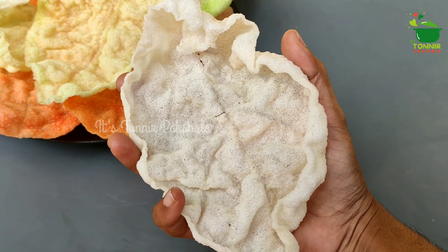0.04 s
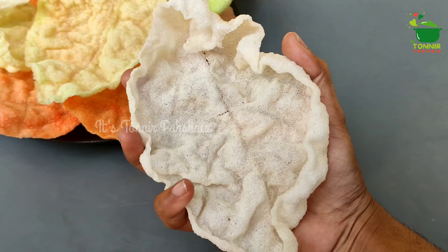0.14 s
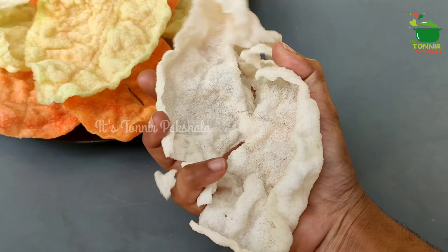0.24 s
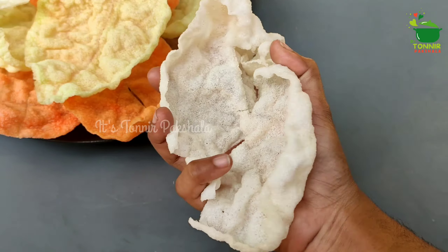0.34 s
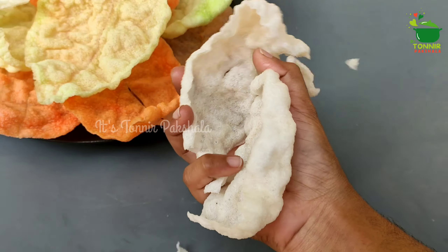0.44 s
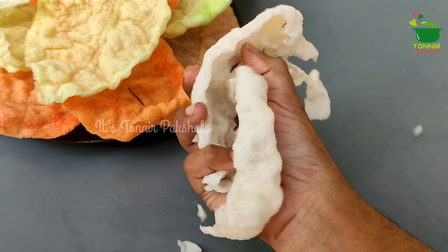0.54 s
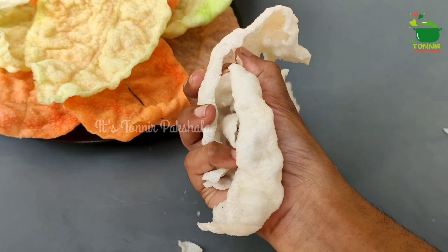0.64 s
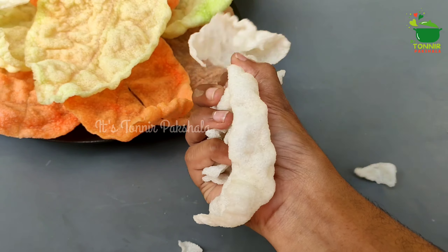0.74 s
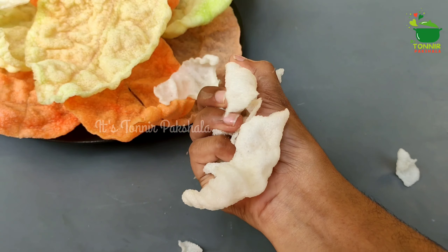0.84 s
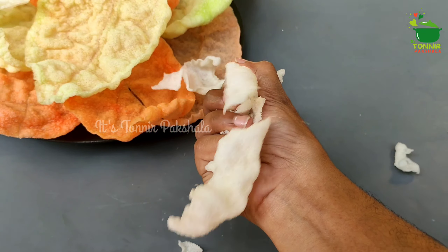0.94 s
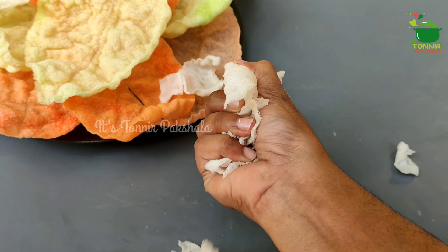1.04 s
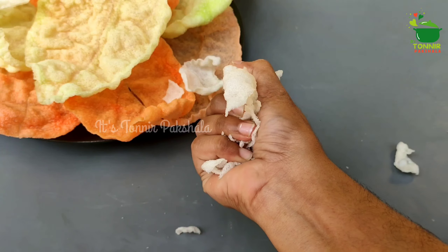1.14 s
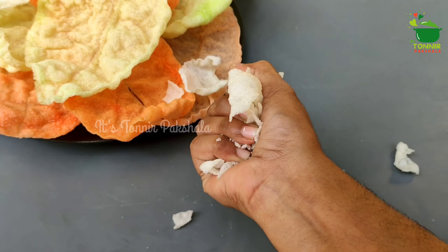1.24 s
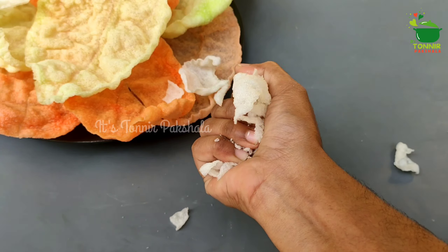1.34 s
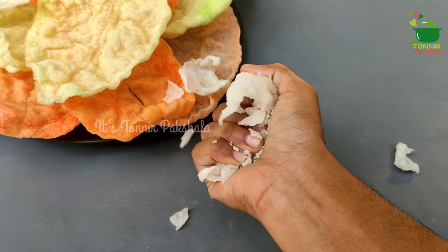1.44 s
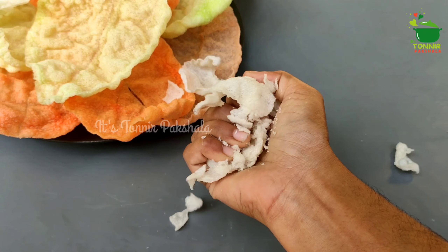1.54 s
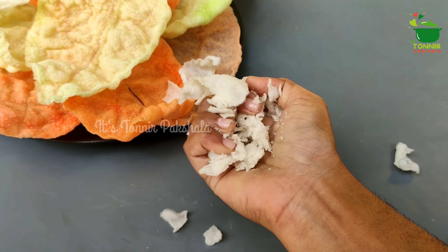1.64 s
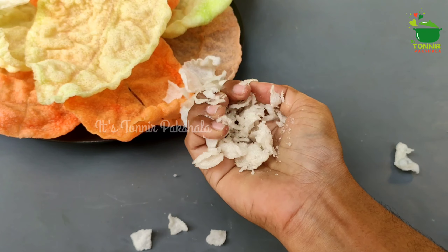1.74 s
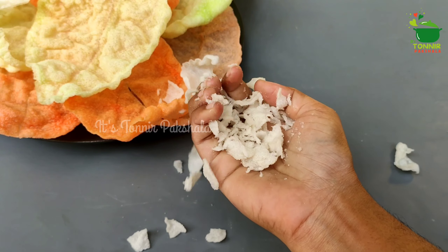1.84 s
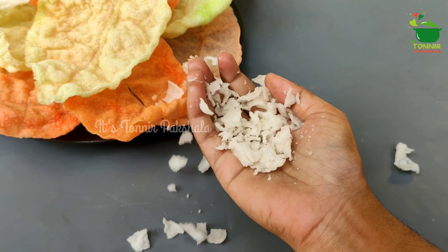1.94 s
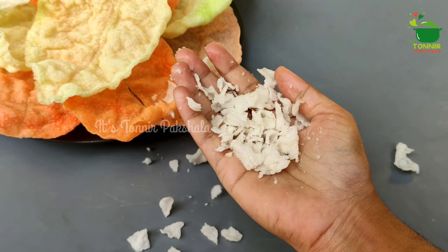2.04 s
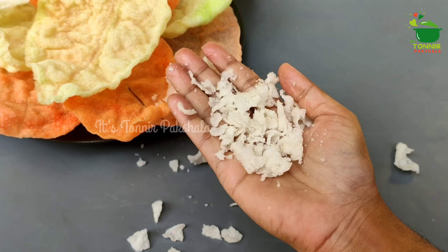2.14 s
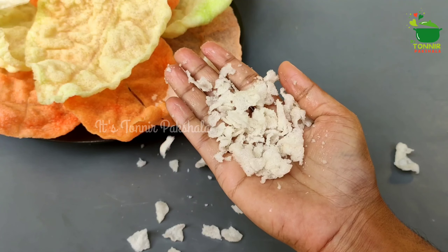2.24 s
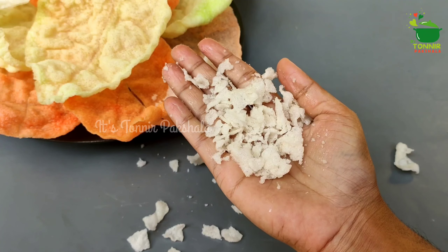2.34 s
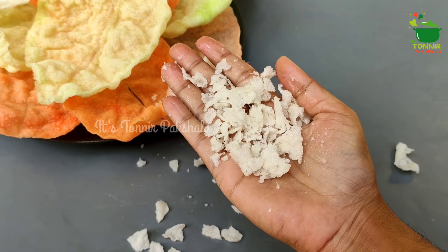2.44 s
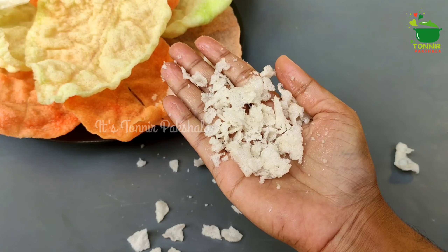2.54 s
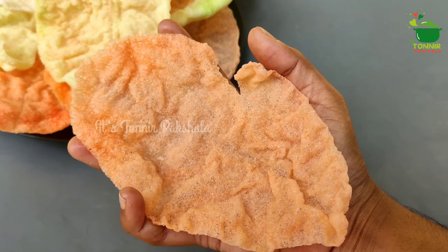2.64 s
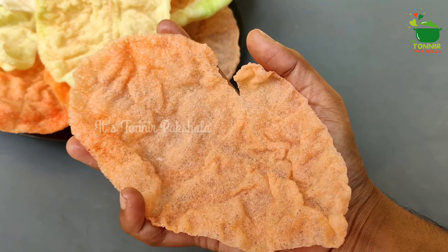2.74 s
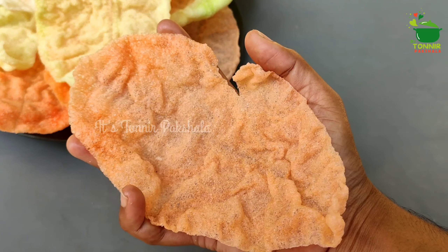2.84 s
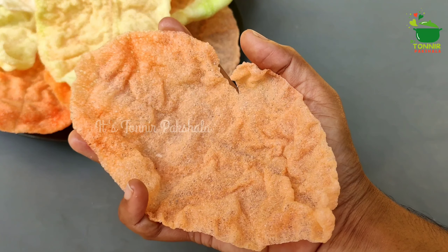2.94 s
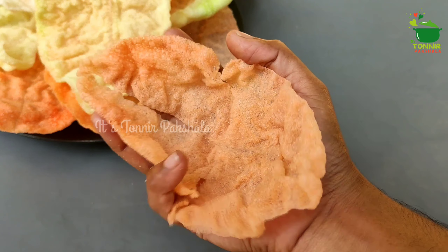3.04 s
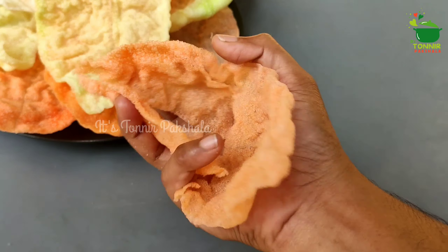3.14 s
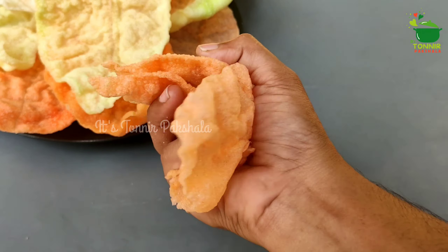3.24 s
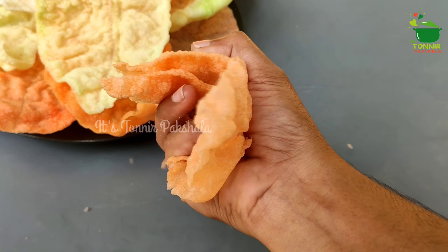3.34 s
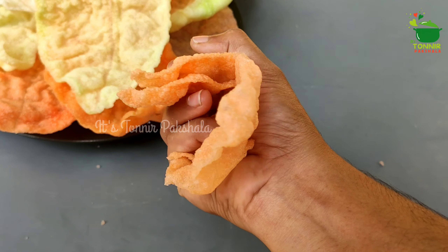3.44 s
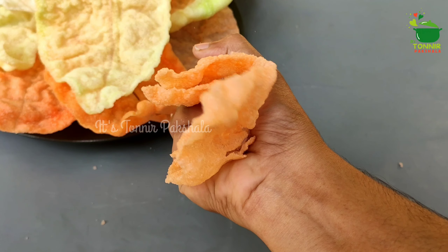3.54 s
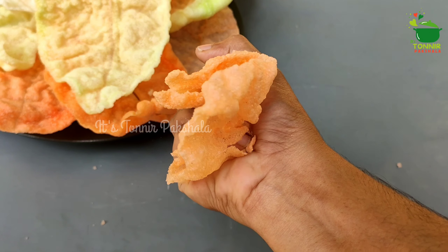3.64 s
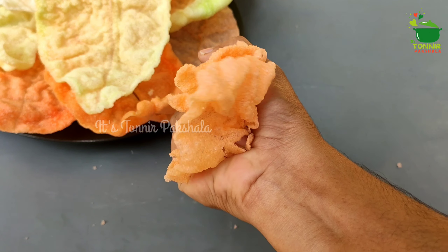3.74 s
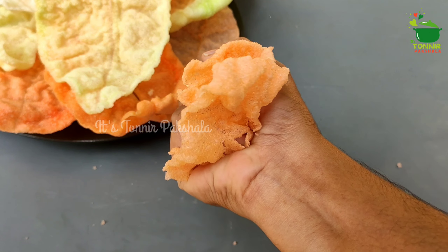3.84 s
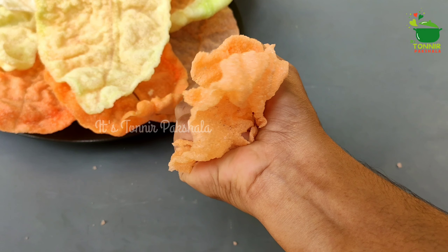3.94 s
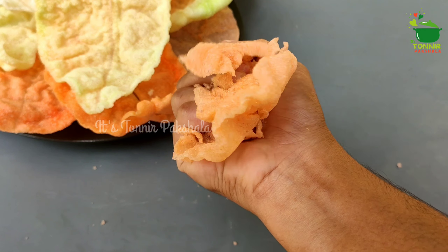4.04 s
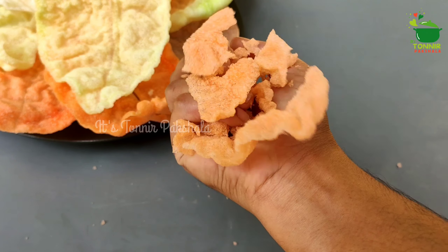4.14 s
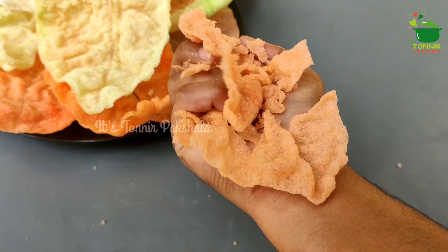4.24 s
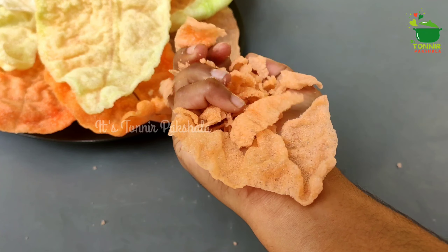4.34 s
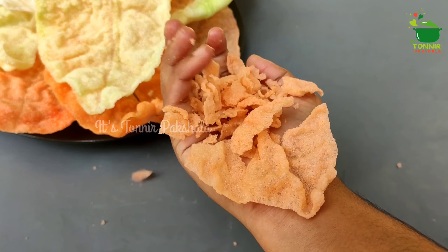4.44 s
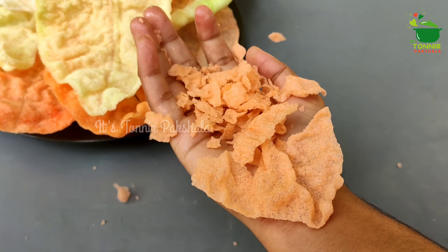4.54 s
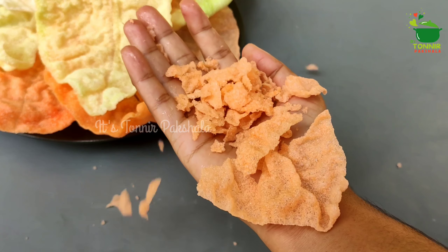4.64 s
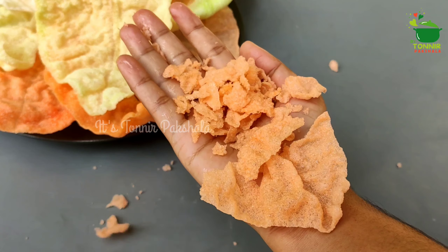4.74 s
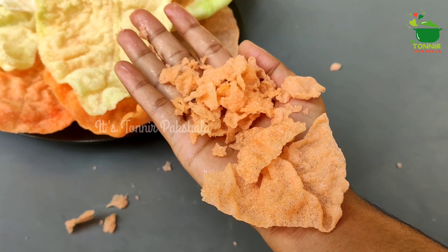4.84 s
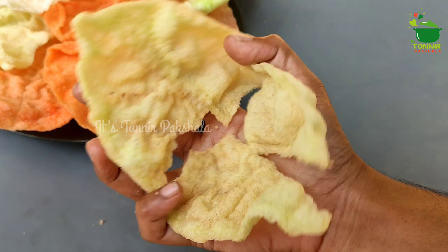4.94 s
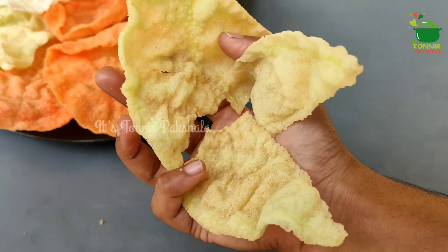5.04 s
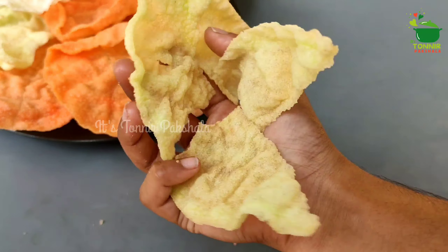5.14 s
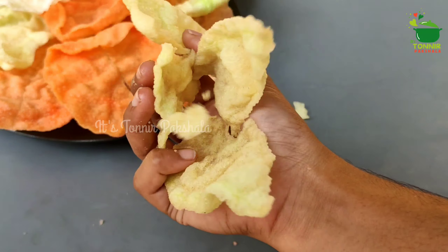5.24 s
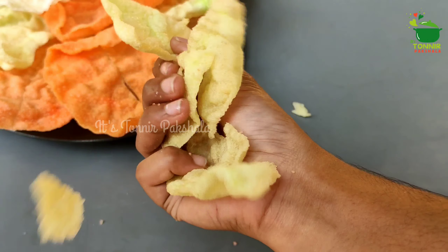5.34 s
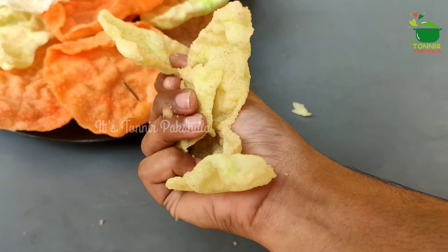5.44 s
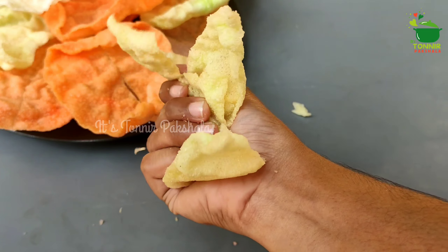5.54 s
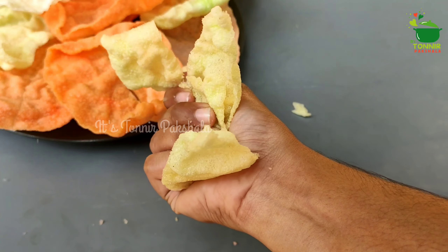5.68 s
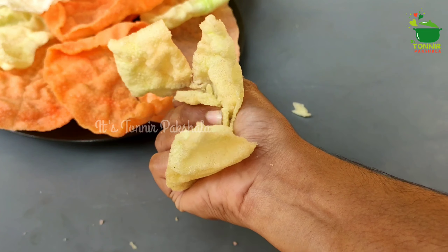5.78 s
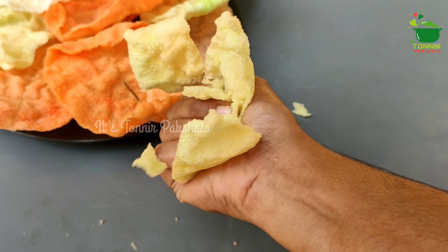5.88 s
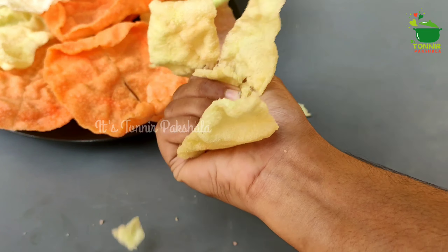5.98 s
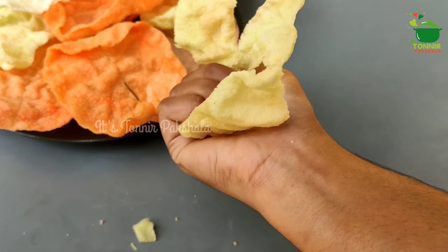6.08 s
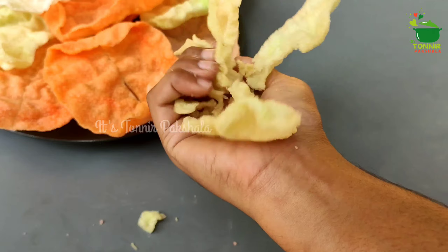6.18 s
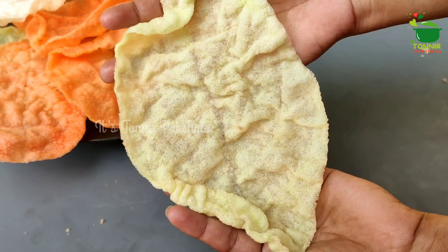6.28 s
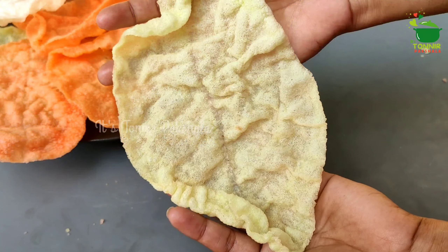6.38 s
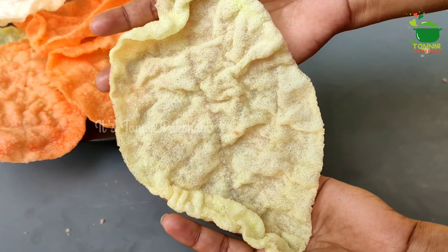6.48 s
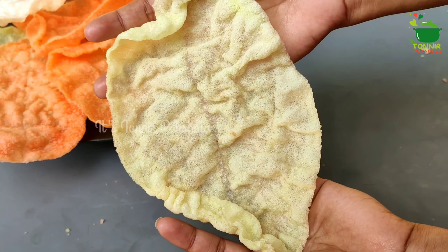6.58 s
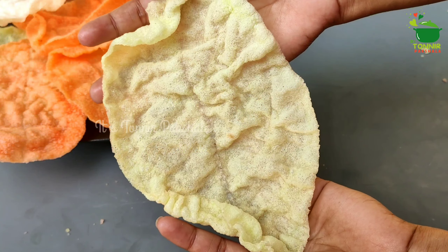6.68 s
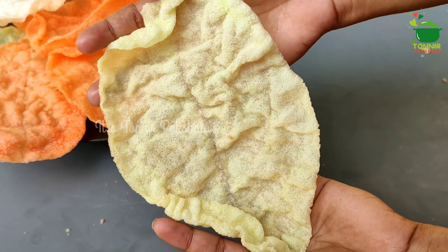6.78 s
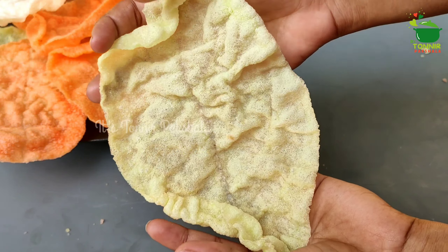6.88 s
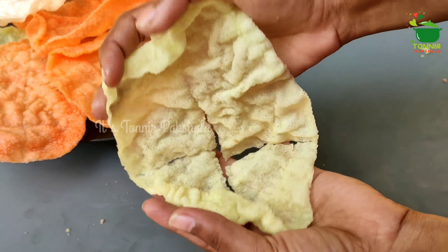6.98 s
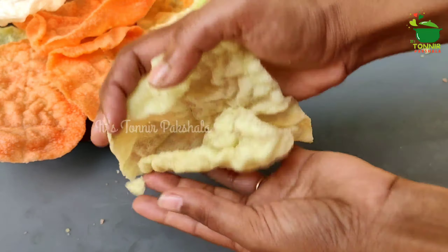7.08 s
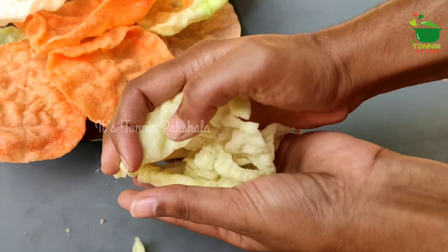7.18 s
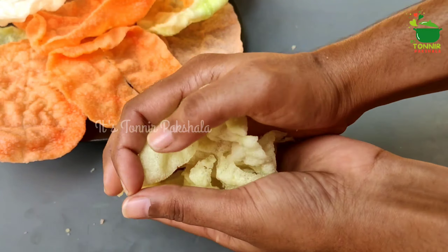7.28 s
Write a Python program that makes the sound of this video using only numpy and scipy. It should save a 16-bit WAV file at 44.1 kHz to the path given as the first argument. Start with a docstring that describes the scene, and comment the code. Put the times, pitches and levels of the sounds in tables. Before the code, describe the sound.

Four crisp fried wafers are crushed by hand one after another, with loud brittle snaps, dense crackle and falling crumbs, close up in a quiet kitchen.

```python
"""In a kitchen, four crisp fried wafers are crushed by hand, one after another, near a two-port microphone.
Each squeeze is a swell of filtered noise and crumb ticks, set with ragged noise bursts as loud snaps.
A large piece bounces on the pile as decaying sine modes; sparse reflections follow these near sounds.
A far bird caws hoarsely outside, as noise through gliding resonances. Low-passed noise is the draught
that buffets the microphone at first, and steady coloured noise is the hush of the air."""
import sys
import numpy as np
from scipy import signal
from scipy.fft import rfft, irfft
from scipy.io import wavfile
from scipy.ndimage import uniform_filter1d

SR = 44100
rng = np.random.default_rng(int(sys.argv[2]) if len(sys.argv) > 2 else 0)


def wav_out(sig):
    """Save sig, one row per channel (or a flat mono array), as 16-bit PCM at SR to the path in sys.argv[1]."""
    wavfile.write(sys.argv[1], SR, np.round(np.clip(np.atleast_2d(sig).T, -1, 1) * 32767).astype(np.int16))


N = 322503  # length in samples


def gain_of(db):
    """Level to amplitude: 20 dB is a factor of ten."""
    return 10 ** (np.asarray(db) / 20)


def evened(x):
    """Normalisation to an RMS of 1."""
    return x / np.sqrt(np.mean(x ** 2) + 1e-20)


def read(points, hz):
    """Interpolation of a spectrum along a logarithmic frequency axis."""
    f, value = np.transpose(points)
    return np.interp(np.log(hz + 1), np.log(f + 1), value)


def curve(rows, axis):
    """Linear interpolation of one table column over time, holding the end values."""
    rows = np.asarray(rows)
    return np.interp(np.arange(N) / SR, rows[:, 0], rows[:, axis])


def add(mix, s, sound):
    """Superposition of a sound on the mix from s seconds on, cut at the end of the mix."""
    part = mix[..., round(s * SR):][..., :sound.shape[-1]]
    part += sound[..., :part.shape[-1]]


def causal(points):
    """Minimum-phase response of energy 1: the phase is the Hilbert transform of the log magnitude."""
    hz = abs(np.fft.fftfreq(4096, 1 / SR))
    log_gain = np.log(gain_of(np.maximum(read(points, hz), -70)))
    spectrum = np.exp(np.conj(signal.hilbert(log_gain)))
    taps = np.fft.ifft(spectrum).real[:2048]
    return taps / np.linalg.norm(taps)


def band(x, kind, hz, order=2):
    """Butterworth filter: maximally flat in the band it passes."""
    return signal.sosfilt(signal.butter(order, hz, kind, fs=SR, output="sos"), x)


def resonate(x, hz, width):
    """Resonance of peak gain 1, fixed or gliding: shift down to 0 Hz, smooth, shift back."""
    turn = np.exp(2j * np.pi * np.cumsum(hz * np.ones(len(x))) / SR)
    r = np.exp(-np.pi * width / SR)
    return 2 * (turn * signal.lfilter([1 - r], [1, -r], x / turn)).real


def ports(own, lag, size):
    """Partial coherence: noise shared by two ports, lag samples late on the left, and a share of each one's own."""
    shared, left, right = rng.standard_normal((3, size))
    own = np.clip(own, 0, 1)
    common = np.array([np.roll(shared, lag), shared])
    return np.sqrt(1 - own) * common + np.sqrt(own) * np.array([left, right])


def air():
    """Steady hush of the kitchen: stationary noise whose coherence between the ports falls with frequency."""
    # Each row: frequency in Hz, spectral level in relative dB per Hz.
    colour = [(12, -22.5), (20, 3.5), (499, 0.5), (1480, -6.5), (3840, -31.5), (4180, -14), (6010, -26.5),
              (16000, -14)]
    # Each row: frequency in Hz, left-right likeness from 0 to 1.
    likeness = [(60, 0.96), (300, 0.93), (1000, 0.01)]
    level_db = -67
    hz = np.fft.rfftfreq(N, 1 / SR)
    same = np.clip(read(likeness, hz), -1, 1)
    a, b = rfft(rng.standard_normal((2, N)))
    spectra = np.array([a, same * a + np.sqrt(1 - same ** 2) * b]) * gain_of(read(colour, hz))
    return gain_of(level_db) * evened(irfft(spectra, N))


def draught():
    """Turbulent pressure at the microphone: slow buffeting that stops with one sudden drop of pressure."""
    # Each row: time in seconds, level in dB; the draught stops at the last row.
    strength = [(0.0, -59.5), (1.09, -56), (2.19, -59.5), (2.33, -65)]
    # Last gust, cut short. Each row: time in seconds, pressure as a share of full scale.
    push = [(2.24, 0), (2.325, 0.013), (2.334, 0.0091), (2.335, -0.00083), (2.4, 0)]
    slow = band(ports(own=0.011, lag=0, size=N), "low", 45, order=3)
    buffet = evened(band(slow, "high", 4.8))
    blowing = np.arange(N) / SR < strength[-1][0]
    return buffet * gain_of(curve(strength, axis=1)) * blowing + curve(push, axis=1)


def bird():
    """Source and filter: hoarse, throbbing noise through gliding throat resonances, blurred by distance."""
    # Each row: start in seconds, length in seconds, level in dB before the fades.
    calls = [(1.624, 0.24, -62.5), (2.195, 0.31, -61), (5.941, 0.304, -61.5), (6.467, 0.35, -62)]
    # Each row: resonance in Hz at the start, width in Hz, level in relative dB, glide as a share of the Hz.
    throat_modes = [(910, 40, 0, .03), (1120, 70, -4, -.08), (1240, 50, -6, -.1)]
    out = np.zeros((2, N))
    for s, length, db in calls:
        along = np.linspace(0, 1, round(length * SR))
        throb = gain_of(2.0 * evened(band(rng.standard_normal(SR), "low", 25)))[:len(along)]
        fades = signal.windows.tukey(len(along), .4)
        for side in out:  # separate noise at each port
            rasp = rng.standard_normal(SR)[:len(along)]
            throat = np.zeros(len(along))
            for hz, width, mode_db, glide in throat_modes:
                pitch = hz * (1 + glide * along)
                mode = resonate(resonate(rasp, pitch, 2 * width), pitch, width)
                throat += gain_of(mode_db) * mode / np.sqrt(width)
            add(side, s, gain_of(db) * evened(throat * throb) * fades)
    return out


def kitchen(x, t60):
    """Exponential decay of sparse reflections of random sign, others for each port, duller than the direct sound."""
    taps = np.zeros((2, SR // 2))
    # one reflection in every 20 samples
    at = np.arange(200, SR // 2 - 20, 20) + rng.integers(0, 20, (2, (SR // 2 - 201) // 20))
    np.put_along_axis(taps, at, rng.choice([-1., 1.], at.shape), 1)
    decay = gain_of(-60 * np.arange(SR // 2) / SR / t60)
    tail = band(taps, "low", 11000, order=1) * decay
    return signal.fftconvolve(x, tail / np.linalg.norm(tail[0]), axes=1)[:, :N]


def pile():
    """Modal impact: each bounce of the fallen piece rings the loose pile in other shares, a little off pitch."""
    # Each row: time of the bounce in seconds, level in relative dB.
    bounces = [(1.434, -25.5), (1.462, -31.5), (1.525, -38.5), (1.557, -42), (1.583, -42), (1.62, -44),
               (1.65, -49), (1.995, -48.5), (2.029, -52), (2.317, -52.5)]
    # Modes of the pile. Each row: frequency in Hz, level in relative dB, 60 dB decay time in seconds.
    modes = [(280, -2, .06), (494, 0, .045), (705, -4, .03), (900, -5, .025), (1200, -12, .015)]
    out, t = np.zeros(N), np.arange(SR // 4) / SR
    hz, mode_db, t60 = np.transpose(modes)[:, :, None]
    for s, db in bounces:
        share, detune = rng.standard_normal((2, len(modes), 1))
        decay = gain_of(mode_db + 1.5 * share - 60 * t / t60)
        ring = decay * np.sin(2 * np.pi * hz * (1 + .03 * detune) * t)
        onset = 1 - np.exp(-t / 0.00032)
        add(out, s, gain_of(db) * ring.sum(0) * onset)
    return band(out, "high", 235, order=3)


def hand():
    """Addition of powers, given in dB: a faint rustle, with each squeeze swelling, holding and dying over it."""
    # The open hand shifting wafer and crumbs. Each row: time in seconds, rustle level in relative dB.
    rustle = [(0.0, -70.5), (0.14, -62.5), (1.8, -54.5), (2.15, -59.5), (2.57, -65.5), (2.75, -60.5),
              (2.85, -48.5), (3.03, -62.5), (4.1, -58.5), (4.58, -52.5), (4.95, -60), (5.2, -58),
              (6.13, -56), (6.34, -65), (6.62, -72), (7.01, -71), (7.31, -52)]
    # Each row: start of the hold in seconds, hold in seconds, level of the fine crackle in relative dB.
    squeezes = [(0.19, 0.08, -53.5), (0.309, 0.027, -33.5), (0.453, 0.27, -41), (0.761, 0.026, -36),
                (0.815, 0.427, -42), (1.287, 0.37, -47.5), (3.112, 0.13, -42.5), (3.277, 0.07, -34.5),
                (3.423, 0.25, -41.5), (3.726, 0.33, -47), (5.019, 0.0043, -31.5), (5.257, 0.282, -47.5),
                (5.579, 0.29, -46), (5.738, 0.011, -38.5), (5.878, 0.078, -48.5), (7.08, 0.007, -32),
                (7.172, 0.1, -37)]
    grip_db_per_s, let_go_db_per_s = 553.5, 393.5
    t, power = np.arange(N) / SR, gain_of(2 * curve(rustle, axis=1))
    for s, hold, db in squeezes:
        swell_db = grip_db_per_s * np.maximum(s - t, 0)
        dying_db = let_go_db_per_s * np.maximum(t - s - hold, 0)
        power = power + gain_of(2 * (db - swell_db - dying_db))
    return 10 * np.log10(power)


def crumbs(count):
    """Impulse excitation: sparse unequal ticks, each kind of crumb ringing at its own pitch and place."""
    out, t = np.zeros((2, N)), np.arange(512) / SR
    for hz in np.geomspace(700, 12000, count):
        size = gain_of(8.5 * np.minimum(rng.exponential(1, N), 3))
        train = size * (rng.random(N) < 25 / SR)  # 25 ticks a second on average
        ring = np.exp(-t * hz / 3.3) * np.sin(2 * np.pi * hz * t)
        tick = signal.oaconvolve(train, ring)[:N]
        lean, lag = gain_of(4.0 * rng.standard_normal()), rng.integers(1, 8)
        out += np.sqrt(hz) * evened(np.array([lean * np.roll(tick, lag), tick / lean]))
    return evened(out)


def crackle():
    """Fracture noise of rustle and crumbs: the harder the squeeze, the brighter and the more clumped."""
    level_db = hand()
    force = np.clip((level_db + 60) / 25, 0, 1)
    clump = gain_of((-0.5 + 3.55 * force) * evened(band(rng.standard_normal(N), "low", 60)))
    clump /= np.sqrt(abs(uniform_filter1d(clump ** 2, SR // 8)))  # keeps the level over 1/8 s
    grain = ports(own=0.69, lag=4, size=N) + (0.062 + 0.37 * force) * crumbs(count=32)
    grain = force * grain + (1 - force) * band(grain, "low", 6900, order=1)
    bright = gain_of(level_db + 1.5) * clump * grain
    return bright, bright * gain_of(-4.0)


def small_snaps(count):
    """Random scatter of snaps, levels spread about a little over the crackle; the resting hand makes none."""
    resting_db, over_db, dull_db = -48, 2, -10.5
    usual_s = 0.0094
    at, (size, stretch) = rng.integers(0, N, count), rng.standard_normal((count, 2)).T
    rows = []
    for k, db, big, long in zip(at, hand()[at], size, stretch):
        if db > resting_db:
            rows.append((k / SR, usual_s * np.exp(0.55 * long), db + over_db + 4.6 * big, dull_db))
    return rows


def snaps():
    """Brittle fracture: a ragged run of cracks, a few sharp, starts and stops fast, with a drawn emphasis."""
    # The snaps that stand out. Each row: start in seconds, nominal length in seconds, level in relative dB,
    # dull part against it in relative dB.
    loud = [(0.17, 0.0061, -46.5, -8), (0.187, 0.0044, -38, -7), (0.264, 0.0043, -27, -4.5),
            (0.274, 0.0025, -27.5, -14), (0.287, 0.0012, -23, -18), (0.3012, 0.0052, -15.5, -6),
            (0.309, 0.0052, -17.5, -26), (0.326, 0.019, -24, -7), (0.4965, 0.0089, -22, -16.5),
            (0.5425, 0.0087, -31.5, 1), (0.5826, 0.009, -30.5, -5), (0.5903, 0.016, -29, -9.5),
            (0.6086, 0.006, -30.5, -9), (0.644, 0.011, -22.5, -16), (0.6573, 0.0074, -26.5, -9),
            (0.688, 0.015, -24.5, -7), (0.7578, 0.023, -24.5, -11.5), (0.917, 0.022, -27, -15.5),
            (0.95, 0.015, -35.5, -18), (1.0168, 0.0059, -23.5, -18.5), (1.042, 0.026, -39.5, -29),
            (1.222, 0.039, -39, -41), (1.421, 0.0045, -35, 3), (1.43, 0.0063, -36.5, 14),
            (1.482, 0.0072, -42.5, 3), (1.557, 0.0026, -41, -10), (1.754, 0.0052, -46, -26),
            (1.856, 0.012, -51.5, 2), (1.894, 0.0056, -48.5, -6), (1.9896, 0.0093, -46, -7.5),
            (2.041, 0.0082, -52.5, -1), (2.33, 0.0014, -42, 1), (3.029, 0.015, -46, -1.5),
            (3.061, 0.0079, -39.5, -5.5), (3.075, 0.0027, -33.5, -10), (3.099, 0.0067, -21, -11.5),
            (3.1157, 0.023, -24.5, -4), (3.1854, 0.0075, -26, -7.5), (3.199, 0.0074, -28, -17.7),
            (3.2436, 0.0097, -32, -0.5), (3.2746, 0.017, -29.5, -3), (3.321, 0.012, -31, -1),
            (3.3453, 0.015, -28, -27), (3.3605, 0.006, -24.5, -12.5), (3.437, 0.03, -30.5, -13.5),
            (3.512, 0.02, -30, -31), (3.5474, 0.013, -26.5, -33), (3.583, 0.02, -26, -30),
            (3.621, 0.028, -28.5, -25), (3.663, 0.015, -39.5, -22), (3.731, 0.0078, -40.5, -25),
            (3.7948, 0.03, -34.5, -30), (3.838, 0.034, -32.5, -16.5), (3.945, 0.033, -38, -31),
            (4.167, 0.021, -50, -9), (4.555, 0.022, -50.5, 2), (4.815, 0.011, -46.5, -6.5),
            (5.0011, 0.026, -22.5, -7.5), (5.1423, 0.012, -48, -6), (5.2295, 0.007, -40, -10),
            (5.265, 0.013, -37.9, -10), (5.285, 0.0044, -27.5, -3.5), (5.3392, 0.0042, -26, -11),
            (5.435, 0.0094, -30, -15), (5.446, 0.0048, -28, -31), (5.457, 0.016, -31, -28),
            (5.5067, 0.0026, -23.5, -19), (5.572, 0.0091, -39, -31.5), (5.5904, 0.011, -29, -28),
            (5.6074, 0.033, -30, -24), (5.66, 0.0038, -30.5, -2), (5.6895, 0.0062, -34, -25),
            (5.711, 0.011, -30.5, -34), (5.736, 0.0054, -36.5, -15), (5.804, 0.012, -32.5, -28),
            (5.8158, 0.029, -36.5, -16), (5.8735, 0.0062, -40.5, -13), (6.0195, 0.0092, -47, -27),
            (6.147, 0.0033, -41, -23), (6.213, 0.015, -52.5, -12.5), (7.048, 0.0031, -27, -3.5),
            (7.055, 0.0054, -39, -10.5), (7.0663, 0.0082, -18, -1.5), (7.0863, 0.0032, -17.5, -9),
            (7.112, 0.0075, -27, -16), (7.1256, 0.0073, -25.5, -6), (7.185, 0.0047, -35, -17),
            (7.2168, 0.0069, -20, -11), (7.2256, 0.0097, -22, -30.5), (7.243, 0.015, -24, -10.5),
            (7.277, 0.0036, -30, -30), (7.2944, 0.0049, -26.5, -29)]
    emphasis_low_hz, emphasis_high_hz = 2510, 6700
    bright, dull, t = np.zeros((2, N)), np.zeros((2, N)), np.arange(4096) / SR
    for s, length, db, dull_db in loud + small_snaps(count=90):
        # randomly drawn emphasis, often near the microphone's peak
        hz = emphasis_low_hz * (emphasis_high_hz / emphasis_low_hz) ** (rng.random() ** 0.37)
        ragged = gain_of(3.7 * evened(band(rng.standard_normal(len(t)), "low", 400)))
        hits = rng.exponential(1, len(t)) * (rng.random(len(t)) < 250 / SR)
        sharp = signal.lfilter([1], [1, -np.exp(-1 / (0.0013 * SR))], hits)  # each dies in 1.3 ms to 1/e
        rise = np.minimum(t / (0.62 * length), 1) ** 1.2
        fall = gain_of(-60 * np.maximum(t - 0.87 * length, 0) / (0.0084 + 2.93 * length))
        shape = rise * fall * ragged * (1 + 0.76 * sharp)
        shape *= gain_of(db) / np.sqrt(np.sum(shape ** 2) / (length * SR))
        burst = ports(own=0.6, lag=rng.integers(2, 6), size=len(t)) * shape
        emphasis = np.array([resonate(side, hz, 300 + 0.067 * hz) for side in burst])
        add(bright, s, gain_of(-2.0) * (band(burst, "low", 12000, order=1) + gain_of(3.0) * emphasis))
        add(dull, s, gain_of(5 + dull_db) * burst)
    return bright, dull


def fragments(x, patchy_db):
    """Time-varying filter: breaking fragments favour their own pitches, in random patches some 30 ms long."""
    z = signal.stft(x, nperseg=256, noverlap=192)[2]
    patches = uniform_filter1d(rng.standard_normal(z.shape[1:]), size=4, axis=0)
    patches = uniform_filter1d(patches, size=20, axis=1)
    return signal.istft(z * gain_of(patchy_db * evened(patches)), nperseg=256, noverlap=192)[1][:, :N]


def wafer():
    """Linear filtering: all cracks take one overall colour; the dull part is nearly alike at both ports."""
    # Overall colour of the cracks as picked up, wafer and microphone together.
    # Each row: frequency in Hz, spectral level in relative dB per Hz.
    colour = [(59, -52.5), (100, -24.5), (255, -13), (315, -8.5), (662, -5), (1280, -4), (1650, -4.5),
              (2320, -5.5), (6020, -4.5), (6700, -3.5), (7610, -9), (13800, -16), (16000, -21.5)]
    split_hz = 1510  # dull part below, bright part above
    (bright, dull), (snap, thud) = crackle(), snaps()
    middle = (dull + thud).mean(0)
    dull = middle + 0.17 * (dull + thud - middle)
    dull = band(dull, "high", 220)  # a thin wafer radiates no deep bass
    both = band(bright + snap, "high", split_hz, order=3) + band(dull, "low", split_hz, order=3)
    return signal.oaconvolve(fragments(both, patchy_db=2.5), causal(colour)[None], axes=1)[:, :N]


def scene():
    """Superposition of the near sounds, their reflections at -14 dB, and the background."""
    near = wafer() + pile()
    return near + gain_of(-14) * kitchen(near, t60=0.13) + bird() + draught() + air()


def record(dry):
    """Band limit: a linear-phase low-pass at 16.1 kHz."""
    taps = signal.firwin(255, 16100, window=("kaiser", 12), fs=SR)
    return signal.oaconvolve(dry, taps[None], "same")


dry = scene()
out = record(dry)
wav_out(out)
```